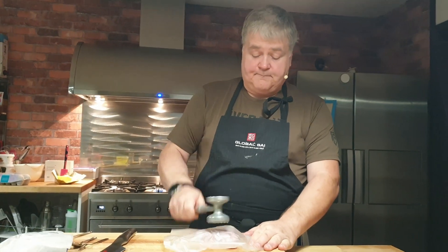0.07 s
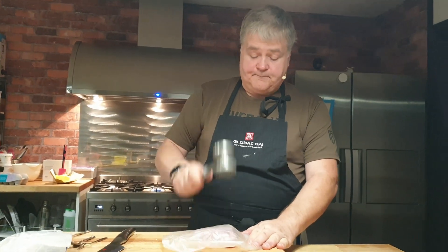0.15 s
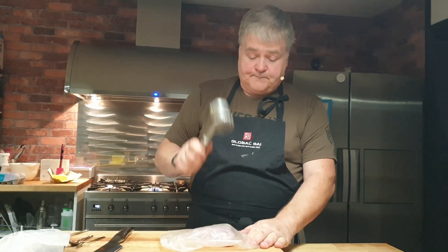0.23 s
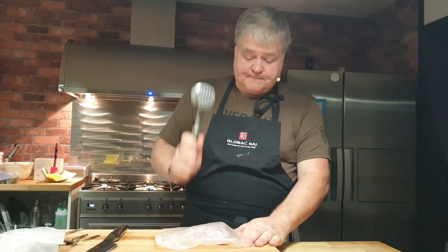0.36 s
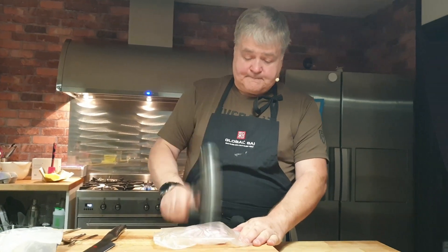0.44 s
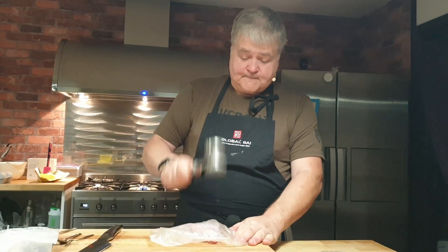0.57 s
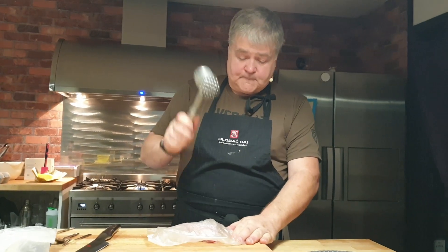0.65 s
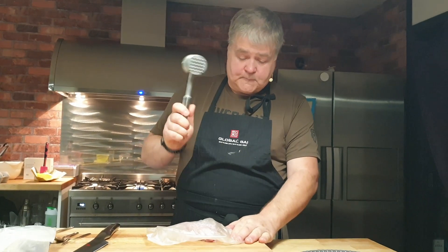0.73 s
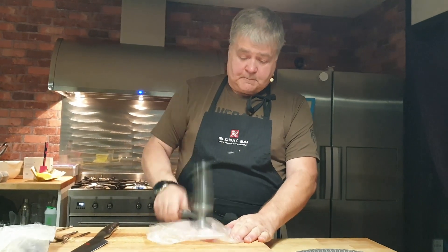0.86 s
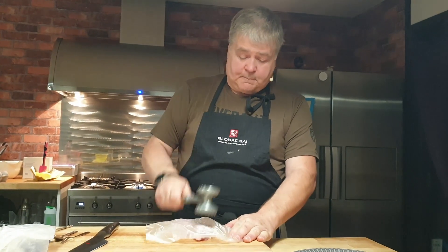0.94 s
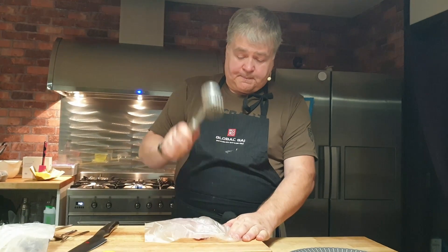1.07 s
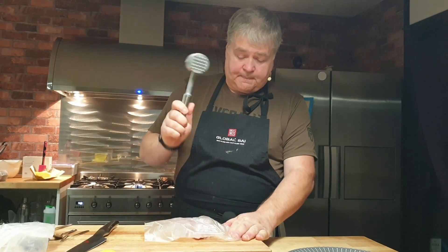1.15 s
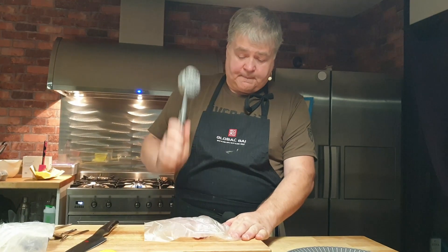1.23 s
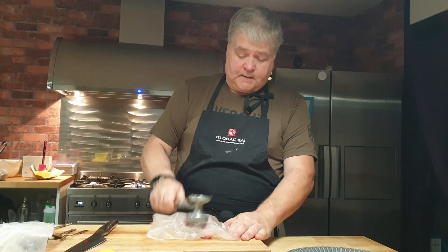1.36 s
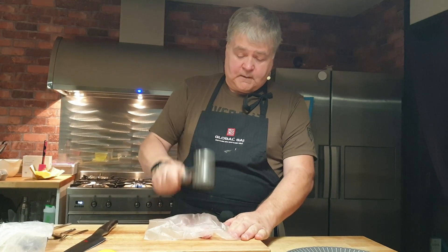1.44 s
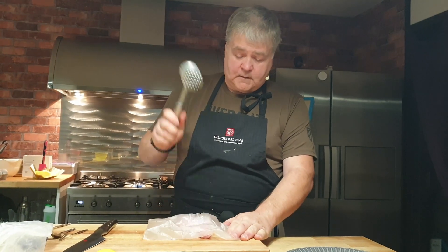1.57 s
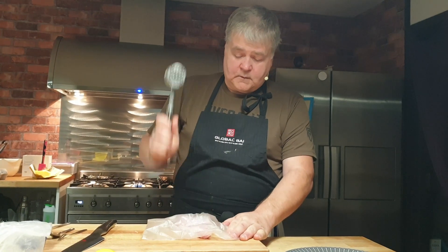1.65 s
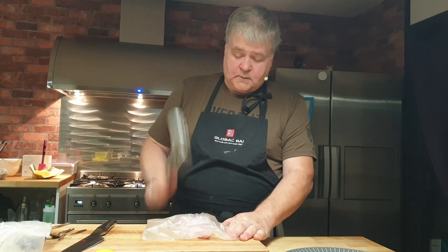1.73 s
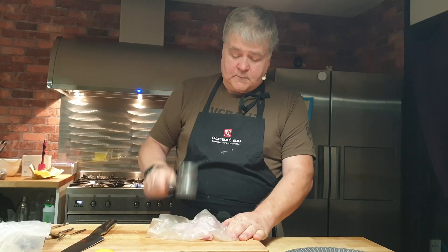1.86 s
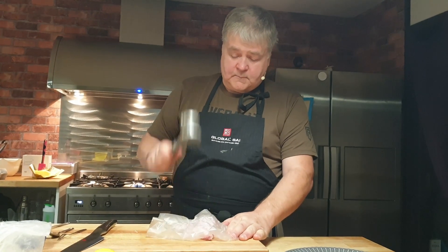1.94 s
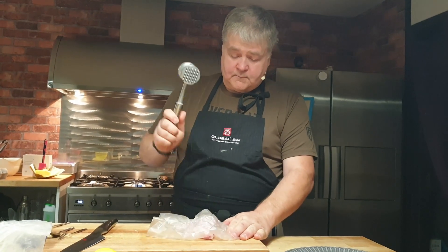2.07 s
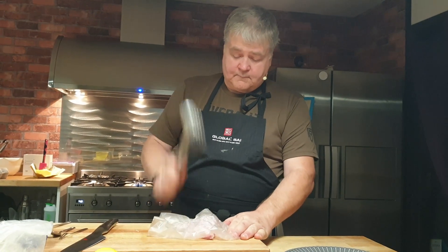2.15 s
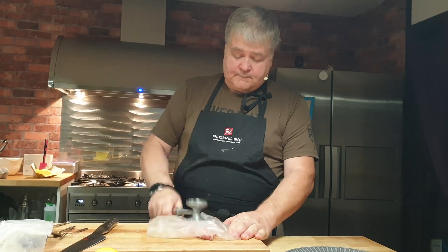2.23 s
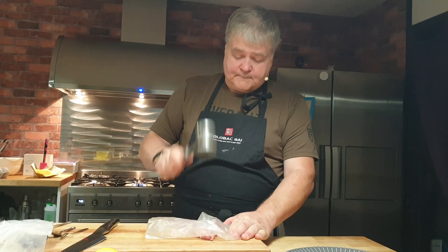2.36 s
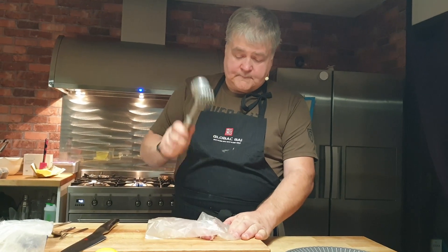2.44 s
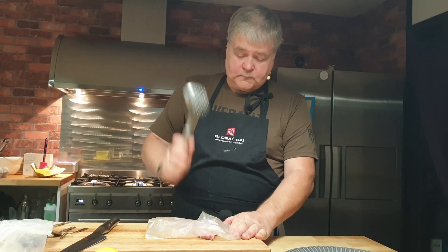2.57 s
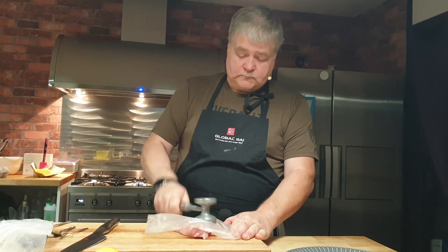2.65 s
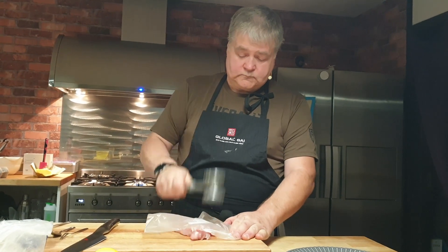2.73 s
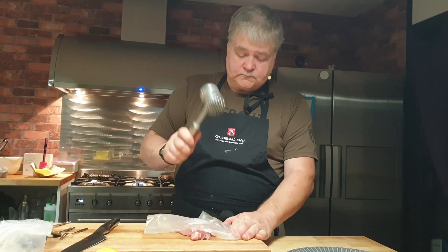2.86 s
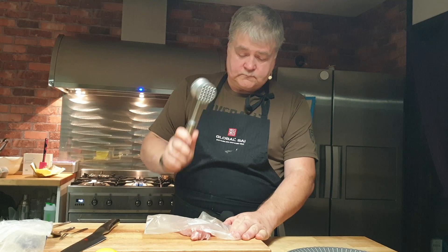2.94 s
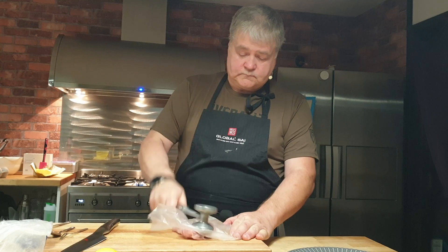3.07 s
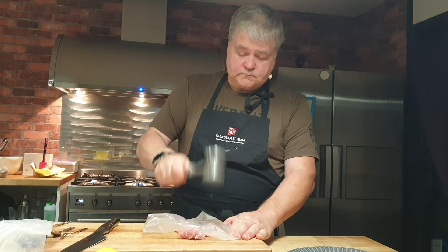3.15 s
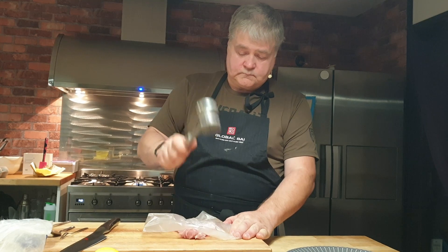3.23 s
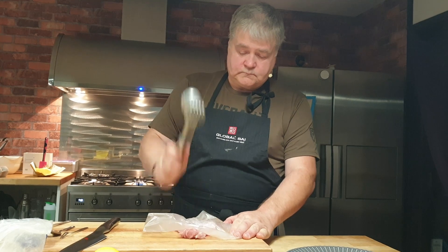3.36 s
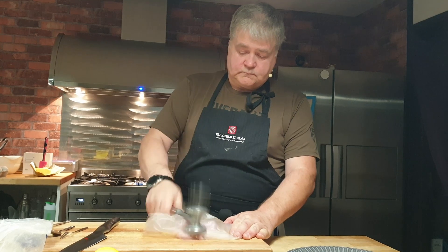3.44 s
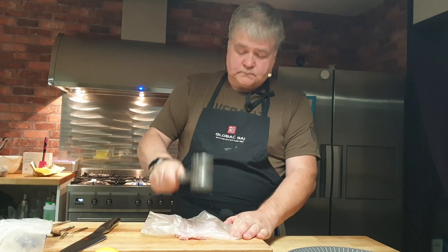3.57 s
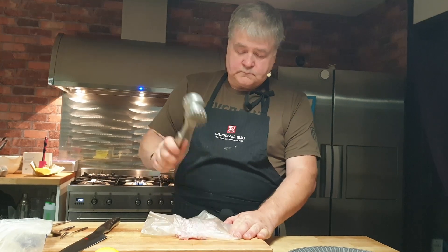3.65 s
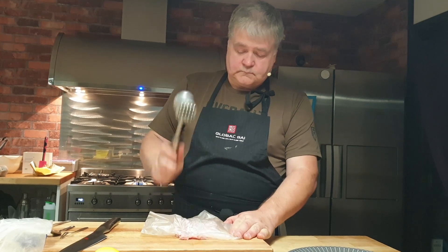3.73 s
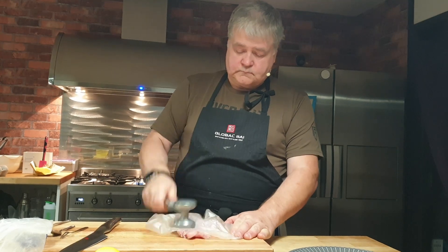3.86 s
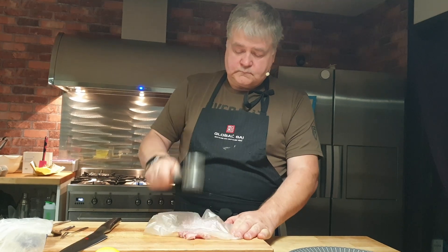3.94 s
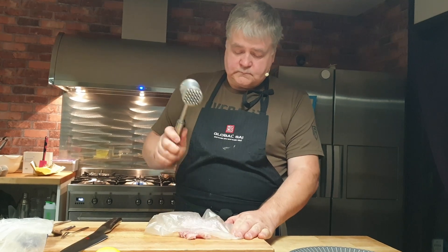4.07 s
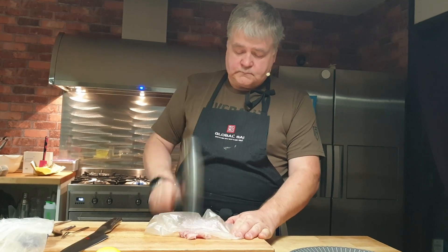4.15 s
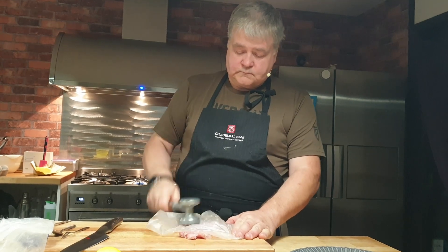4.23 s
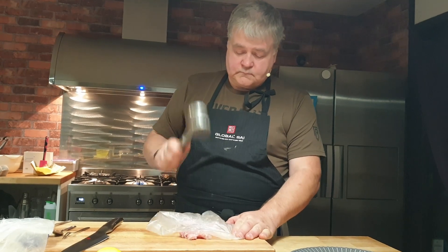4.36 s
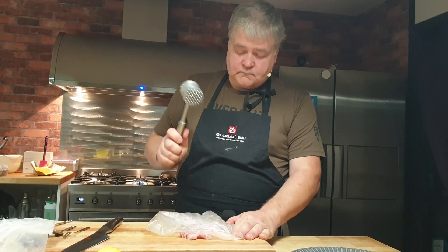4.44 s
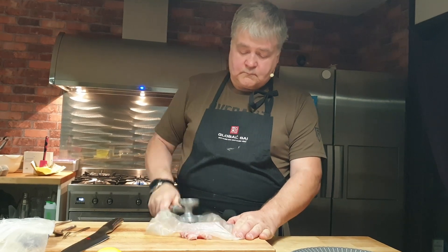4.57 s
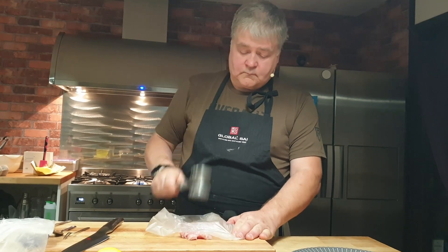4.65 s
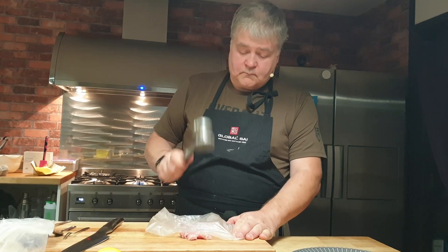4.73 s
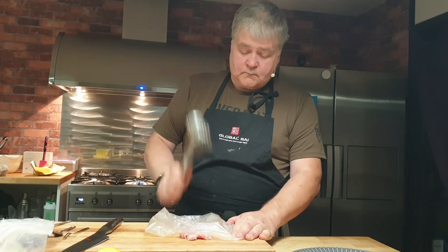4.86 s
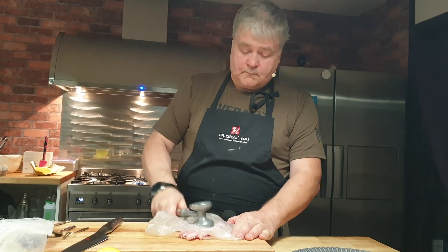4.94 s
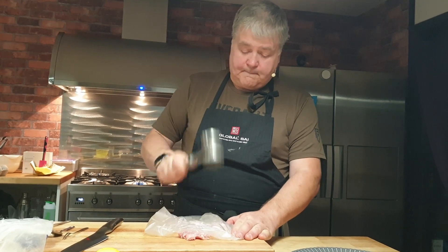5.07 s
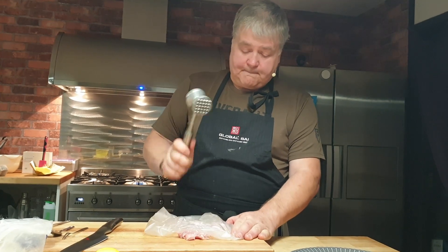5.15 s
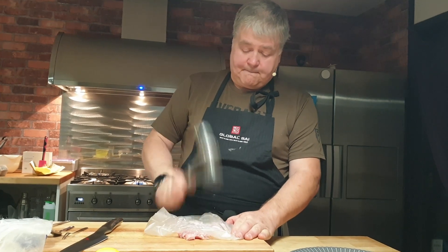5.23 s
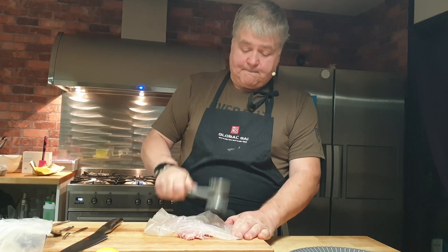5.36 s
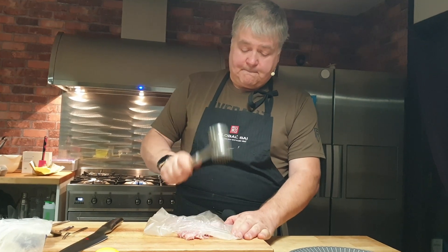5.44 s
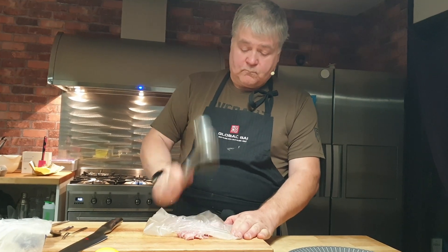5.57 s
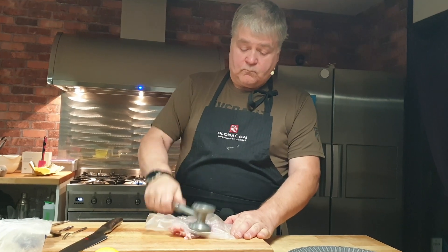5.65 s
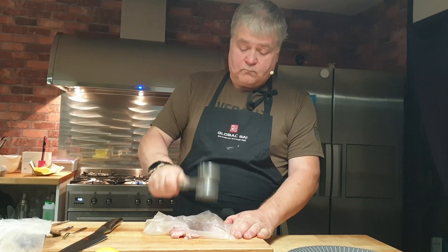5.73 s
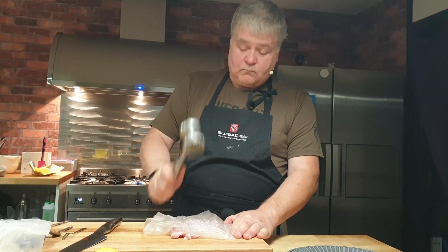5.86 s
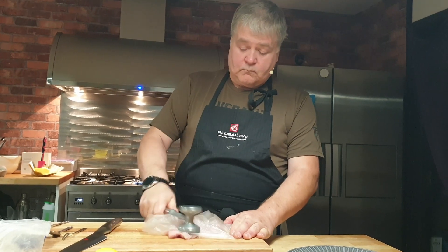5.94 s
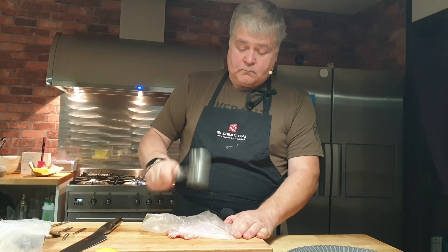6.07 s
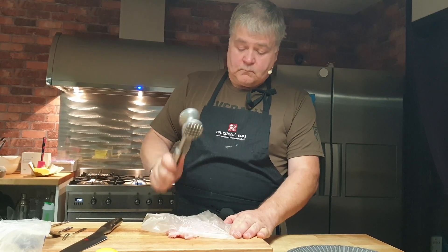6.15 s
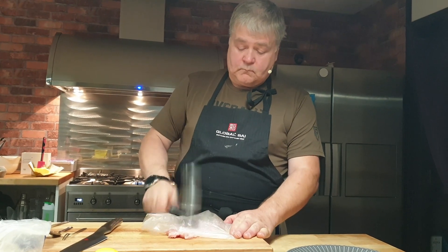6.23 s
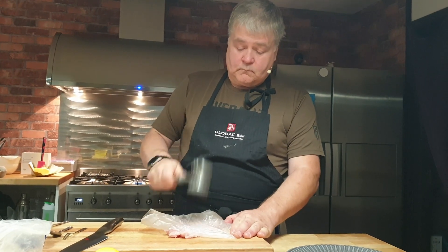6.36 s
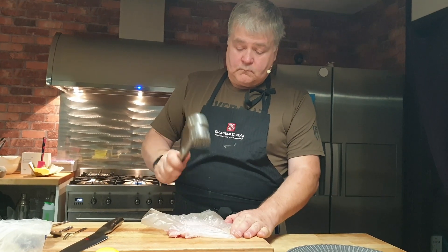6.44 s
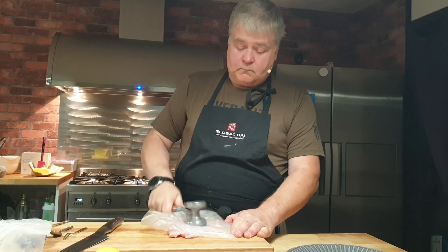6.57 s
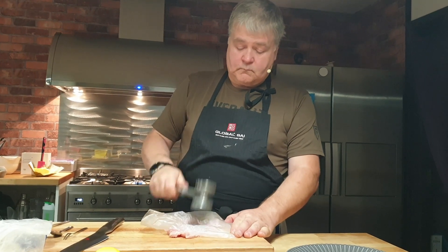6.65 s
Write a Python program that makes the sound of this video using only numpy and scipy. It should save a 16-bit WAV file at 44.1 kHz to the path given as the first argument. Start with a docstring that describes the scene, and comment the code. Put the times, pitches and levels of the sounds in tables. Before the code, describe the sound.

In a quiet kitchen, a metal mallet strikes meat through a plastic bag on a wooden board, over twice a second and slightly quickening. Each blow is a sharp wet-plastic slap with a low counter boom, a woody clack as the board hops back, and a brief jangle of loose steel tools. Bag and sleeve rustle faintly between. Close microphone, loud and slightly saturated, short room ring.

```python
"""Over a faint room floor, a metal mallet pounds meat through a plastic bag on a wooden board in a kitchen.
Each blow slaps the bag (shaped noise burst), sets off board chatter and room ring (knocks and noise in
decaying bands) and booms the counter (swelling sines). The board slaps back with a click and ringing modes,
loose steel tools hop and clink (wavering sines), sleeve and bag rustle (grainy noise), short dry ticks fall between."""
import sys
import numpy as np
from scipy import signal
from scipy.fft import rfft, irfft
from scipy.io import wavfile
from scipy.ndimage import uniform_filter1d

SR = 44100
rng = np.random.default_rng(int(sys.argv[2]) if len(sys.argv) > 2 else 0)


def wav_out(sig):
    """Save sig, one row per channel (or a flat mono array), as 16-bit PCM at SR to the path in sys.argv[1]."""
    wavfile.write(sys.argv[1], SR, np.round(np.clip(np.atleast_2d(sig).T, -1, 1) * 32767).astype(np.int16))


N = 295470


def undb(db):
    """Decibels to gain."""
    return 10 ** (np.asarray(db) / 20)


def add(out, start_s, x):
    """Mix x into out from start_s."""
    i = max(int(start_s * SR), 0)
    out[i:i + len(x)] += x[:len(out) - i]


def peak(x, db):
    """Scale x to a peak level."""
    return x * undb(db) / np.abs(x).max()


def colour(x, table):
    """Shape the spectrum of x by (Hz, dB) points; rms 1."""
    hz, db = np.transpose(table)
    log_f = np.log(np.arange(len(x) // 2 + 1) * SR / len(x) + 1)
    gain = undb(np.interp(log_f, np.log(hz), db))
    y = irfft(rfft(x) * gain, len(x))
    return y / np.sqrt(np.mean(y ** 2))


def band(x, hz, octaves):
    """Bell-shaped band around hz, 6 dB down at the given octaves to each side; rms 1."""
    steps = np.arange(-3, 3.5, .5)
    return colour(x, [(hz * 2 ** (k * octaves), -6 * k * k) for k in steps])


# Spectrum of the room's floor. Each row: frequency in Hz, relative level in dB per Hz.
FLOOR_SPECTRUM = [(30, -5), (60, -7), (130, -3.5), (320, -9), (1700, -15), (9000, -19.5), (16000, -31)]
FLOOR_RMS_DB = -74


def room_floor():
    """Steady noise, strongest in the bass."""
    return undb(FLOOR_RMS_DB) * colour(rng.standard_normal(N), FLOOR_SPECTRUM)


# Mallet blows, shared by all sources they drive. Each row: start in s, slap peak in dB, counter boom in dB,
# thud in dB, knock in dB, sizzle in dB, ring-out stretch (factor), air in dB, slap tilt in dB per octave,
# squeeze in dB, slap decay in ms, board rebound peak in dB, rebound pitch in Hz.
BLOWS = [(0.0606, -6, -22, -31, -19, -14.5, 0.88, -25, 2, -14, 2, -18, 540),
         (0.4996, -1, -20, -29, -17.5, -13, 0.95, -21.5, 5.5, -21, 1.2, -7, 563),
         (0.923, 7, -19, -27.5, -17, -11, 1.0, -19, -0.5, -20, 2.6, -6, 395),
         (1.3604, 1, -20.5, -26.5, -14, -8.5, 0.88, -22.5, -1.5, -18, 1.9, -13.5, 674),
         (1.8149, -0.5, -18.5, -24.5, -13, -9, 0.92, -24.5, 0, -5, 3.1, -10.5, 1342),
         (2.2565, 6, -20, -25, -16.5, -7, 0.95, -28, -0.5, -15.5, 1.8, -5.5, 939),
         (2.6808, 1, -19.5, -27, -16, -8.5, 0.88, -29.5, 1.5, -9, 3, -9.5, 550),
         (3.0818, 5.5, -21.5, -23.5, -16.5, -7.5, 0.87, -29, 2, -17, 2, -3.5, 736),
         (3.4854, -1.5, -22, -22, -16, -11.5, 0.79, -26.5, 1, -13, 1.4, -11, 820),
         (3.8612, -4.5, -21.5, -28.5, -17.5, -11, 0.88, -29, 1.5, -13.5, 1.8, -12.5, 791),
         (4.2329, 0, -19.5, -23, -12.5, -8, 0.93, -31.5, 1.5, -2, 3.1, -4, 1240),
         (4.608, 4, -19, -23, -10.5, -9, 0.85, -28, -1, -19, 3.9, 2, 790),
         (4.9613, 2, -20.5, -26.5, -18, -11, 0.84, -29, 0.5, -14.5, 1.64, -3.5, 740),
         (5.3114, 4, -22, -28, -19, -8.5, 0.86, -34, -1.5, -21, 2.7, -5.5, 750),
         (5.6557, 1.5, -22.5, -25.5, -20.5, -8.5, 0.8, -42, -0.5, -18.5, 3.9, -8, 794),
         (5.9775, -3, -23.5, -22, -15.5, -16, 0.79, -30, 1.5, -8, 3.3, -5, 423),
         (6.2913, 1.5, -22, -30, -18.5, -13, 0.9, -32, -0.5, -22, 2, -10.5, 1290),
         (6.6108, 3.5, -22.5, -26, -15.5, -13, 1, -31, -1.5, 1, 3, -10.5, 1220)]
# Slap spectrum before the tilt. Each row: frequency in Hz, relative level in dB per Hz.
SLAP_SPECTRUM = [(180, -9.5), (300, 7.5), (3300, 5.5), (5100, -3.5), (5740, 4.5), (6670, -3), (10300, -5),
                 (15200, -15.5), (16500, -34.5)]
SQUEEZE_MS, SLAP_LEAD_S = 2.3, .0012


def slaps():
    """Air squeezed from the bag swells for an instant, then the head lands in a short noise burst."""
    out, ms = np.zeros(N), np.arange(SR // 40) * 1000 / SR
    for start_s, slap_db, *_, tilt_db, squeeze_db, decay_ms, _, _ in BLOWS:
        swell = undb(squeeze_db) * (ms / SQUEEZE_MS) ** 1.1
        burst = np.exp(-(ms - SQUEEZE_MS) / decay_ms)
        shape = np.where(ms < SQUEEZE_MS, swell, burst)
        tilted = [(hz, db + tilt_db * np.log2(hz / 2000)) for hz, db in SLAP_SPECTRUM]
        noise = colour(rng.standard_normal(len(ms)), tilted)
        add(out, start_s - SLAP_LEAD_S, peak(shape * noise, slap_db))
    return out


# Bands of board chatter and room ring.
# Each row: centre in Hz, relative level in dB, swell time in ms, t60 in s before the blow's stretch.
CHATTER_BANDS = [(53.7, -16, 40, 0.72), (119, -16, 14, 0.83), (207, 8.5, 5.2, 0.3), (407, -3.5, 32, 0.52),
                 (834, -0.5, 3.8, 0.37), (1565, -9.5, 15, 0.47), (3300, -14, 1.9, 0.45),
                 (7530, -12, 0.73, 0.36), (10800, -22, 2.1, 0.28), (14900, -24, 4, .3)]
KNOCKS_PER_S, SPIKY_SHARE, SPIKY_FADE_S, LUMP_DB = 700, 0.22, 0.031, 1.95


def chatter():
    """Knocks of the shaken board, dense in the room's ring: spiky, then smooth, each band dying alone."""
    out, t = np.zeros(N), np.arange(int(.7 * SR)) / SR
    n = len(t)
    for start_s, _, boom_db, thud_db, knock_db, sizzle_db, stretch, air_db, *_ in BLOWS:
        hits = rng.random(n) < KNOCKS_PER_S / SR
        sizes = undb(3.9 * np.minimum(rng.exponential(size=n), 2.5))
        knocks = hits * sizes * rng.choice([-1, 1], n)
        knocks[0] += 1e-6  # never all silent
        spiky = SPIKY_SHARE * np.exp(-t / SPIKY_FADE_S)
        smooth = rng.standard_normal(n)
        forces_db = [boom_db, thud_db, knock_db, sizzle_db, air_db]
        for hz, db, swell_ms, t60_s in CHATTER_BANDS:
            force_db = np.interp(np.log(hz), np.log([80, 250, 900, 5000, 13000]), forces_db)
            grain = np.sqrt(spiky) * band(knocks, hz, 1.0) + np.sqrt(1 - spiky) * band(smooth, hz, 0.68)
            rise = 1 - np.exp(-t * 1000 / swell_ms)
            fall = np.exp(-np.log(1000) * t / (t60_s * stretch))
            # above 300 Hz the rattle comes in lumps a few milliseconds long
            steps = np.repeat(rng.standard_normal(n // 300 + 1), 300)[:n]
            lumps_db = LUMP_DB * uniform_filter1d(steps, size=200) * (hz > 300)
            add(out, start_s, undb(db + force_db + lumps_db) * grain * rise * fall)
    return out


# Modes of counter and board, which swell before they die. Each row: frequency in Hz before detuning,
# relative level in dB, signed amplitude factor, time of the swell's peak in ms, steepness (exponent).
COUNTER_MODES = [(53.6, -33.5, 0.28, 180, 1.2), (61.3, 3, 0.98, 38, 2.2), (79.94, -0.5, -0.82, 29.7, 0.97),
                 (91.4, 1.5, -1.21, 22.6, 1.1), (122.6, -11.5, 0.44, 34, 1.2), (159.7, 1, 0.95, 13, 0.69),
                 (196.84, 2, 1, 18.5, 0.55), (239.4, -3, 0.75, 36.8, 1.2)]
COUNTER_LAG_MS, DETUNE = 1.52, 0.013
DRUM_DB, DRUM_PER_THUD, USUAL_THUD_DB = -31.5, 3.4, -27  # the top mode grows faster than the thud


def counter():
    """Each blow starts the same modes: boom drives the bass, thud the upper ones, the top one drums alone."""
    out, t = np.zeros(N), np.arange(SR // 2) / SR
    for start_s, _, boom_db, thud_db, *_ in BLOWS:
        drum_db = DRUM_DB + DRUM_PER_THUD * (thud_db - USUAL_THUD_DB)
        for hz, db, factor, peak_ms, steepness in COUNTER_MODES:
            force_db = boom_db if hz < 110 else thud_db if hz < 220 else drum_db
            detune = 1 + DETUNE * rng.standard_normal()
            u = t * 1000 / peak_ms
            swell = (u * np.exp(1 - u)) ** steepness
            wave = factor * np.sin(2 * np.pi * hz * detune * t) * swell
            add(out, start_s + COUNTER_LAG_MS / 1000, undb(db + force_db) * wave)
    return out


# Further slaps as the board hops. Each row: start in s, ring peak in dB, loudest pitch in Hz, click peak in dB.
BOUNCES = [(0.098, -14, 424, -15.5), (0.529, -9, 497, -9), (0.955, -4.5, 720, -24.5), (1.09, -35, 738, -38),
           (1.396, -13.5, 613, -12.5), (1.848, -0.5, 840, -11.5), (2.289, -2, 771, -13.5),
           (2.511, -42, 1500, -50), (2.719, -11, 890, -10), (3.119, -11, 1250, -20), (3.9, -14, 412, -18),
           (4.268, -2, 800, -2.5), (4.641, -14, 735, -8), (5.342, -8.5, 556, -26.5),
           (5.405, -28.5, 412, -33), (6.327, -10, 1250, -13), (6.36, -28, 1250, -29),
           (6.637, -20.5, 826, -4)]
# Modes of the board. Each row: frequency in Hz before detuning, t60 in s.
BOARD_MODES = [(314, 0.14), (361, 0.15), (420, 0.12), (540, 0.078), (640, 0.074), (760, 0.05), (850, 0.025),
               (990, 0.07), (1115, 0.032), (1254, 0.086), (1400, 0.11), (1600, 0.048), (1900, .04)]
REBOUND_MS, CLICK_OVER_KNOCK_DB = 8.8, -4  # first slap back after each blow
CLICK_MIN_HZ, CLICK_LAG_S, CLICK_DECAY_S, RING_ATTACK_S = 830, .0007, 0.00093, 0.00045


def board():
    """Each slap clicks, wood on stone, and rings the board's modes, most those near its pitch."""
    out, t = np.zeros(N), np.arange(SR // 6) / SR
    hz, t60_s = np.transpose(BOARD_MODES)[:, :, None]
    rebounds = [(blow[0] + REBOUND_MS / 1000, *blow[-2:], blow[4] + CLICK_OVER_KNOCK_DB) for blow in BLOWS]
    hits = rebounds + list(BOUNCES)
    chance = rng.standard_normal((len(hits), 2, len(BOARD_MODES), 1))
    for (start_s, ring_db, pitch_hz, click_db), (size, tune) in zip(hits, chance):
        share = undb(-9 * np.log2(hz / pitch_hz) ** 2 + 5.0 * size)
        waves = np.sin(2 * np.pi * hz * (1 + 0.021 * tune) * t)
        rings = (share * waves * undb(-60 * t / t60_s)).sum(axis=0)
        add(out, start_s, peak(rings * (1 - np.exp(-t / RING_ATTACK_S)), ring_db))
        click_hz = max(pitch_hz, CLICK_MIN_HZ)
        click = -np.sin(2 * np.pi * click_hz * t) * t * np.exp(-t / CLICK_DECAY_S)
        add(out, start_s + CLICK_LAG_S, peak(click, click_db))
    return out


# Modes of the loose steel tools, one entry per mode: pitch in Hz; time to fall 60 dB in s; swell in ms.
STEEL_HZ = [1529, 1960, 2374, 3312, 4656, 5184, 5469, 5733, 6428, 7525, 8780, 10372, 13300, 11040, 9720,
            2164]
STEEL_T60_S = [0.38, 0.33, 0.4, 0.36, 0.32, 0.34, .3, 0.34, .3, 0.37, 0.33, 0.31, .28, .33, 0.28, .38]
STEEL_SWELL_MS = [5.1, 3.7, 8.5, 9, 17, 13, 4.5, 16, 5, 4.5, 8, 5.5, 7.5, 7.5, 7.5, 7.5]
# Clearest landings of the tools. Each row: time in s, one swell after the onset; mode index from 0; level in dB.
CLINKS = [(0.113, 4, -38), (0.541, 1, -34.5), (0.562, 11, -40), (0.564, 8, -35), (0.571, 4, -35.5),
          (0.589, 3, -43.5), (0.595, 5, -44), (0.609, 7, -41.5), (0.967, 4, -32.5), (0.978, 5, -37),
          (0.982, 8, -32.5), (0.992, 11, -41), (1.0, 7, -44), (1.012, 8, -36.5), (1.032, 4, -37),
          (1.434, 4, -39), (1.461, 3, -41.5), (1.504, 7, -48.5), (1.87, 9, -37), (1.882, 8, -37),
          (1.887, 2, -34), (1.889, 4, -32), (1.906, 3, -40), (2.309, 1, -28), (2.313, 4, -38),
          (2.317, 8, -36), (2.342, 8, -43), (2.369, 5, -46), (2.381, 1, -40), (2.718, 4, -34),
          (2.73, 9, -37.5), (2.732, 11, -41), (2.769, 4, -34.5), (2.778, 3, -34.5), (2.778, 8, -44),
          (3.138, 11, -34), (3.17, 4, -40), (3.182, 3, -45), (3.15, 8, -35), (3.513, 4, -30),
          (3.517, 5, -38), (3.517, 11, -41), (3.526, 8, -34.5), (3.921, 11, -38.5), (3.925, 4, -33),
          (3.926, 3, -36), (3.926, 8, -36.5), (3.932, 9, -43), (4.255, 6, -37), (4.269, 4, -26.5),
          (4.27, 0, -23.5), (4.286, 8, -33), (4.283, 7, -42), (4.291, 9, -34.5), (4.3, 15, -31),
          (4.327, 3, -38.5), (4.327, 4, -27), (4.327, 7, -33), (4.373, 0, -35), (4.63, 9, -36),
          (4.646, 7, -35), (4.66, 15, -31.5), (4.675, 8, -37.5), (4.698, 4, -33), (4.71, 7, -36.5),
          (4.711, 3, -33), (5.008, 3, -37.5), (5.007, 11, -42), (5.024, 4, -28), (5.037, 5, -43),
          (5.035, 8, -42.5), (5.345, 7, -37), (5.386, 4, -35.5), (5.396, 3, -41.5), (5.693, 8, -42.5),
          (5.717, 4, -32.5), (5.76, 9, -46), (6.007, 3, -32.5), (6.036, 11, -43), (6.061, 8, -41),
          (6.333, 4, -27), (6.346, 8, -41), (6.346, 11, -39), (6.35, 3, -27.5), (6.38, 2, -32),
          (6.639, 3, -34), (6.662, 8, -36)]
# Softer, later landings after every blow. One entry per mode: level in dB before fall and scatter.
SETTLE_DB = [-72, -61, -70, -39.5, -36.5, -42.5, -65.5, -41.5, -40.5, -46, -54, -53.5, -58, -56, -66.5,
             -72.5]
SETTLE_FROM_S, SETTLE_SPAN_S, SETTLE_FALL_DB_PER_S, SETTLE_SCATTER_DB = 0.022, 0.1, 88.5, 3
JANGLE_FROM_S, JANGLE_SPAN_S = 0.018, 0.054
WAVER_S, WAVER_DB, WAVER_RAD = 0.02, 2.9, .5


def landings():
    """Clear clinks, plus a jangle and a later settling of every steel mode after each blow."""
    contacts = list(CLINKS)
    for blow in BLOWS:
        start_s, sizzle_db = blow[0], blow[5]
        for mode, hz in enumerate(STEEL_HZ):
            late, soft, settle_late, settle_soft = rng.random(4)
            jangle_db = sizzle_db - 30 - 8 * soft - 7 * abs(np.log2(hz / 5000))
            contacts.append((start_s + JANGLE_FROM_S + JANGLE_SPAN_S * late, mode, jangle_db))
            wait_s = SETTLE_SPAN_S * settle_late
            settle_db = SETTLE_DB[mode] - SETTLE_FALL_DB_PER_S * wait_s - SETTLE_SCATTER_DB * settle_soft
            contacts.append((start_s + SETTLE_FROM_S + wait_s, mode, settle_db))
    return contacts


def tools():
    """Each contact restarts one steel mode as a sine; a louder ring hides a fading one."""
    t, size = np.arange(N) / SR, np.zeros((len(STEEL_HZ), N))
    for time_s, mode, db in landings():
        swell_s = STEEL_SWELL_MS[mode] / 1000
        i = max(int(time_s * SR) - int(swell_s * SR), 0)  # each ring swells in softly, smeared by the room
        u = t[:max(min(SR // 2, N - i), 0)]
        fade = (u / STEEL_T60_S[mode]) ** 1.135  # the ring dies slowly at first, then somewhat faster
        ring = undb(db - 60 * fade) * (1 - np.exp(-(u / swell_s) ** 2))
        size[mode, i:i + len(u)] = np.maximum(size[mode, i:i + len(u)], ring)
    out = np.zeros(N)
    for level, hz in zip(size, STEEL_HZ):
        # the ring wavers irregularly in level and phase
        drift = uniform_filter1d(rng.standard_normal((2, N)), int(WAVER_S * SR)) * np.sqrt(WAVER_S * SR)
        wave = np.sqrt(2) * np.sin(2 * np.pi * hz * t + WAVER_RAD * drift[1])
        out += level * undb(WAVER_DB * drift[0]) * wave
    return out


# Bag and sleeve rustle between blows: rises, holds, then fades.
# Each row: time of full level in s, hold in s, hiss in dB, low rustle in dB.
RUSTLES = [(.77, 0.12, -60, -63), (1.142, 0.15, -60.5, -73), (1.6, .05, -73, -65),
           (2.484, 0.14, -59.5, -60), (2.896, 0.025, -63, -58), (3.693, 0.016, -67.5, -61),
           (4.1, 0.028, -70.5, -72), (4.43, .17, -59.5, -66), (4.817, 0.0085, -61.5, -47.5),
           (5.82, 0.014, -62, -48), (6.13, .01, -66, -55), (6.28, 0.047, -57.5, -57.5),
           (6.467, .01, -57, -48.5)]
RUSTLE_RISE_S, RUSTLE_FALL_DB_PER_S = 0.18, 297
# The sleeve swishes louder and louder on some downswings.
# Each row: time of full level in s, hiss in dB, low rustle in dB.
SWINGS = [(.915, -57.5, -37.5), (1.354, -57.5, -42), (2.675, -57, -43), (3.075, -62, -55.5),
          (4.604, -64, -50), (6.604, -55.5, -60)]
SWING_DB_PER_S, SWING_HOLD_S = 323, .008


def rustle():
    """Grainy noise in two colours that rises, holds and fades, or swells into a blow."""
    out, t = np.zeros(N), np.arange(N) / SR
    grain_db = 1.5 * np.minimum(rng.exponential(size=N // 60 + 1), 3.5)
    grit = rng.standard_normal(N) * undb(np.repeat(grain_db, 60)[:N])
    hiss = band(grit, 9000, 0.42)
    low = band(grit, 1300, 1.3) + .25 * band(grit, 3000, 0.084)
    for full_s, hold_s, hiss_db, low_db in RUSTLES:
        rise = np.clip(1 + (t - full_s) / RUSTLE_RISE_S, 0, 1)
        fall = undb(-RUSTLE_FALL_DB_PER_S * np.maximum(t - full_s - hold_s, 0))
        out += rise * fall * (undb(hiss_db) * hiss + undb(low_db) * low)
    for full_s, hiss_db, low_db in SWINGS:
        swell = (t < full_s + SWING_HOLD_S) * undb(SWING_DB_PER_S * np.minimum(t - full_s, 0))
        out += swell * (undb(hiss_db) * hiss + undb(low_db) * low)
    return out


# Short dry ticks of the bag or the tools. Each row: start in s, peak in dB, centre in Hz.
TICKS = [(0.7194, -52, 5740), (2.4977, -39, 6400), (2.6204, -47, 6730), (2.913, -37, 8000),
         (3.7084, -43, 8400), (4.0744, -55, 5740), (4.8294, -51, 5730), (5.1794, -52, 6410),
         (5.8694, -57, 7400)]
TICK_DECAY_S = 0.0014


def ticks():
    """Short dry ticks of the bag or the tools: decaying bursts of narrow-band noise."""
    out, t = np.zeros(N), np.arange(400) / SR
    for start_s, db, hz in TICKS:
        noise = band(rng.standard_normal(len(t)), hz, 0.2)
        add(out, start_s, peak(np.exp(-t / TICK_DECAY_S) * noise, db))
    return out


def scene():
    """All sources over the room's quiet floor."""
    struck = slaps() + chatter() + counter() + board() + tools()
    return (room_floor() + struck + rustle() + ticks())[None]


LOW_CUT_HZ, TOP_HZ = 31, 15900
GATE_DB, GATE_SLOPE, GATE_S = -72, .5, 0.09


def record(dry):
    """The input cuts deep bass, turns down what falls under the gate, rounds loud peaks and cuts the top."""
    dry = signal.sosfilt(signal.butter(2, LOW_CUT_HZ, "high", fs=SR, output="sos"), dry)
    k = 1 / (GATE_S * SR)
    slow_power = signal.lfilter([k], [1, k - 1], dry ** 2)
    quick_power = uniform_filter1d(dry ** 2, 64)
    level = np.sqrt(slow_power + quick_power)
    gain = np.minimum(1, level / undb(GATE_DB)) ** GATE_SLOPE
    rounded = np.tanh(0.72 * gain * dry) / 1.105
    return signal.sosfilt(signal.ellip(8, .2, 70, TOP_HZ, fs=SR, output="sos"), rounded)


dry = scene()
out = record(dry)
wav_out(out)
```